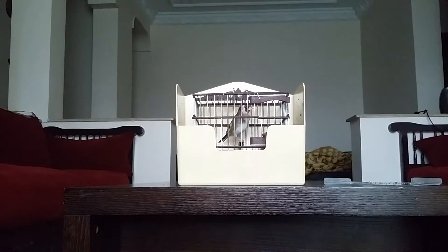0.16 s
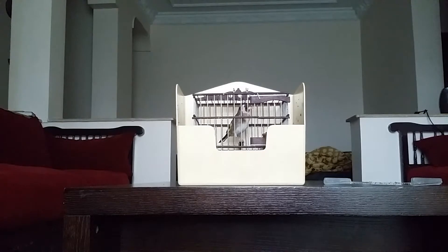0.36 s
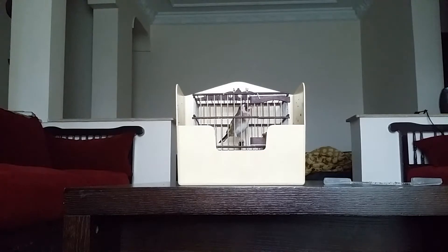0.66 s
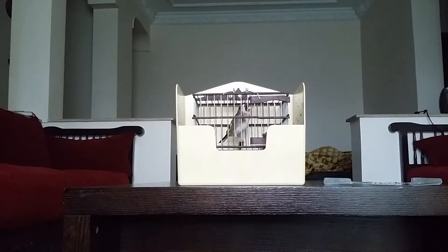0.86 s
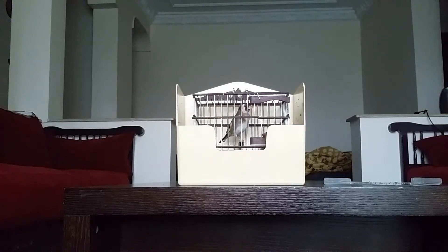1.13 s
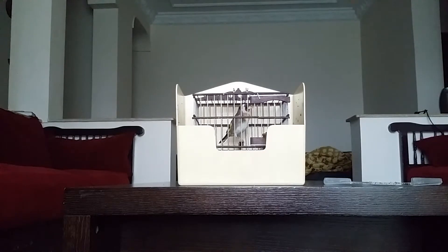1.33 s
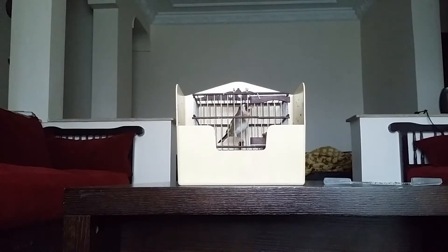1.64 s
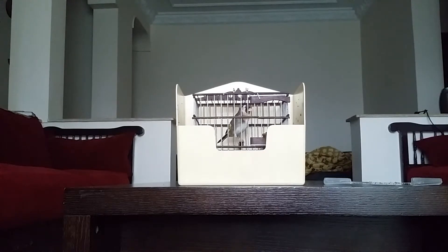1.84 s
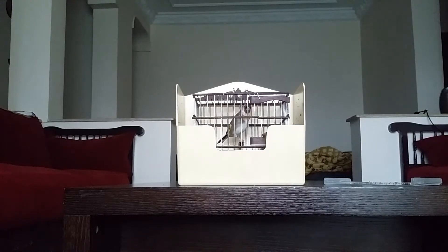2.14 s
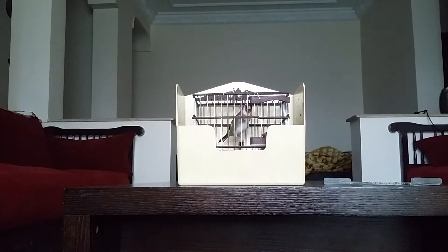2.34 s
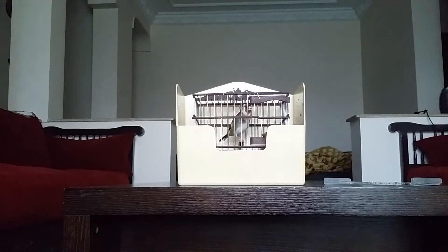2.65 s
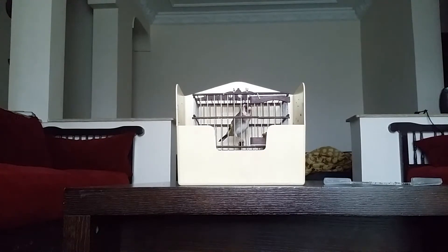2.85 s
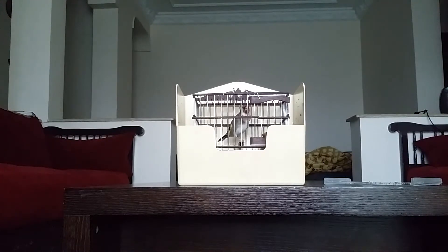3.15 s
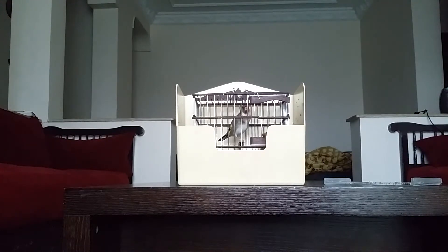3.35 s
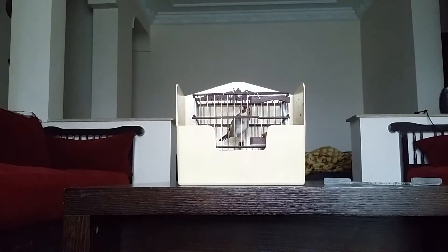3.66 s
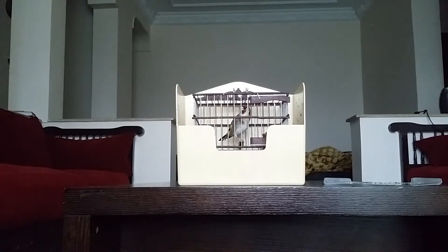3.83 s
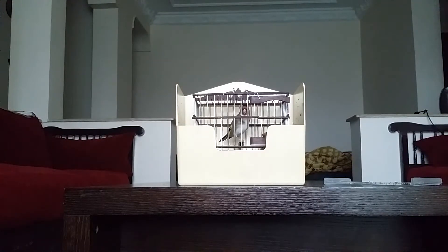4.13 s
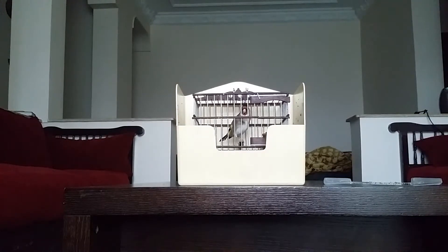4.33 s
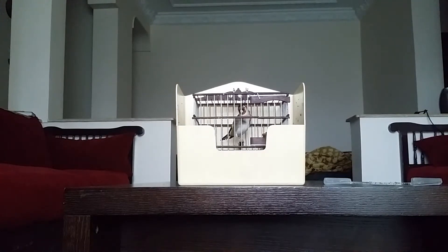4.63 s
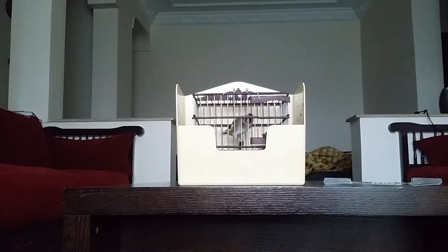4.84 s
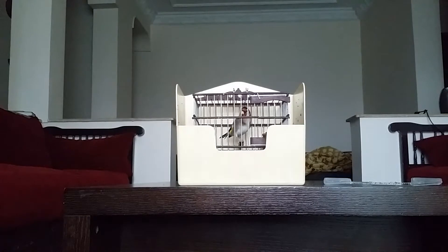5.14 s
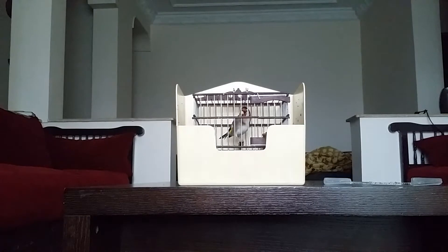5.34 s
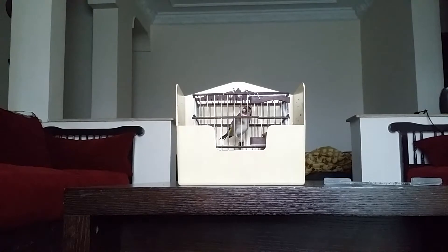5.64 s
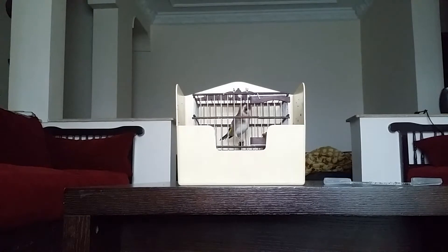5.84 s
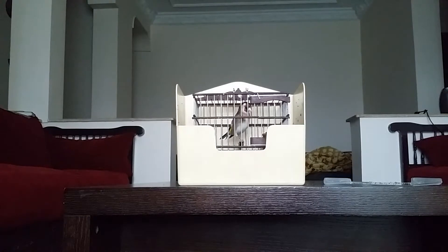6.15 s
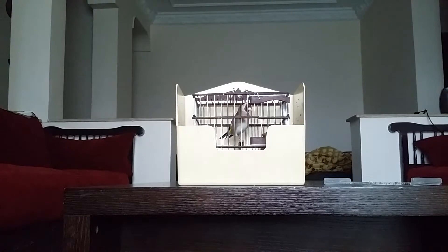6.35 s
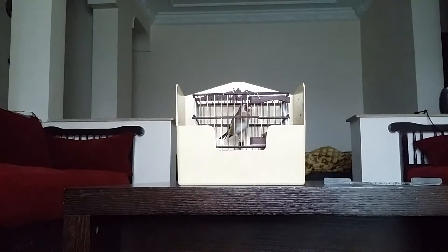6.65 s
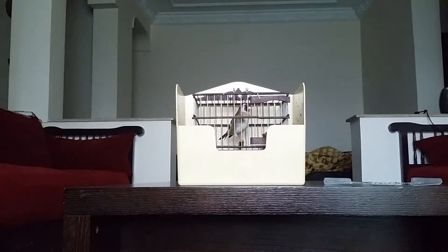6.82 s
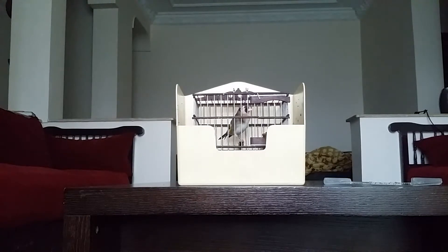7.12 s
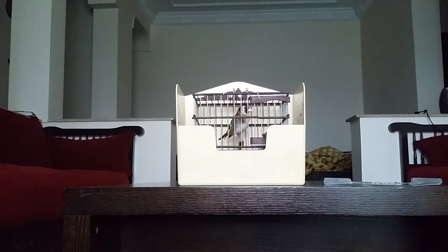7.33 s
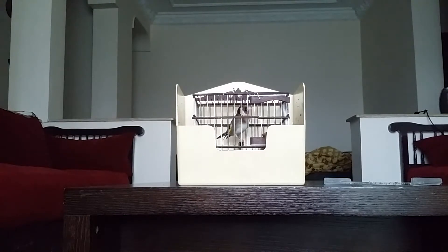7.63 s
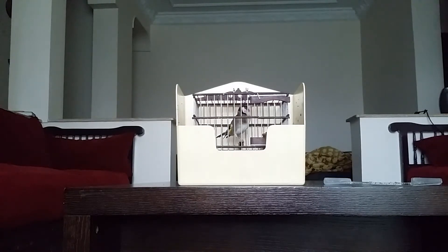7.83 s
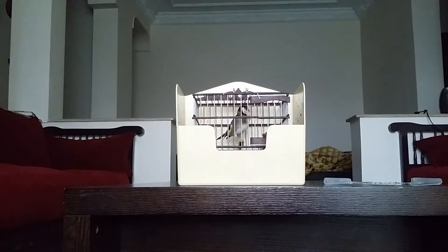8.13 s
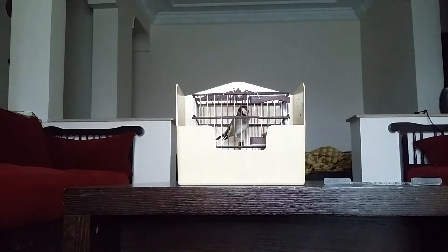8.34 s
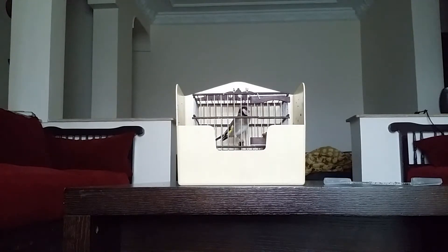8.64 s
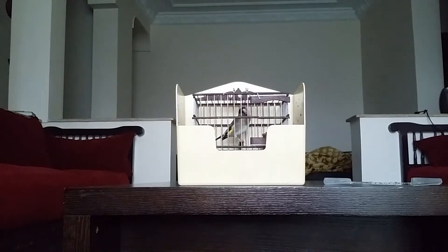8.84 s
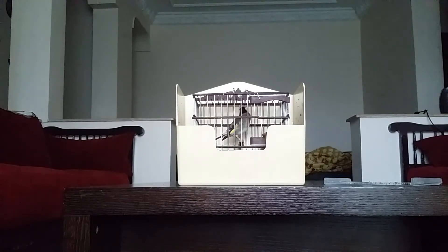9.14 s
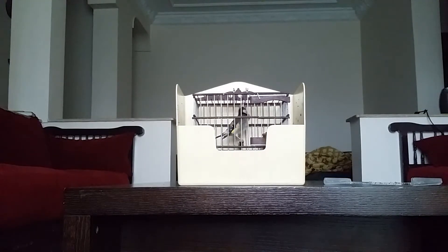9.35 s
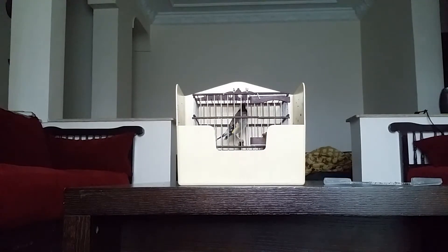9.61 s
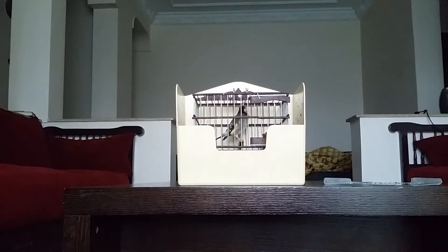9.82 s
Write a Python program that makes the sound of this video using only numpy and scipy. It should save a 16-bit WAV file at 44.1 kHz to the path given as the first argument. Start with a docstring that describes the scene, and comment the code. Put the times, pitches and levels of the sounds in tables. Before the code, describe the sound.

A small caged finch sings in a living room. After a quiet opening of faint hiss, a burst of quick paired whistles starts softly, grows loud and ends abruptly. A pause follows with distant engine hum, then a second, slightly softer burst that fades toward its end. The microphone is a short distance away, with a little room echo.

```python
"""Two bursts of a caged goldfinch's twittering in a living room, over faint engines and a soft hiss.
Each note is a nearly pure whistle gliding onto a held pitch, with 2nd and 3rd harmonics.
Short echoes make the cage; sparse decaying taps make the room.
Engines outside are sums of sine orders; the hiss is shaped noise that swells with the song."""
import sys
import numpy as np
from scipy import signal
from scipy.fft import rfft, irfft, next_fast_len
from scipy.io import wavfile

SR = 44100
rng = np.random.default_rng(int(sys.argv[2]) if len(sys.argv) > 2 else 0)


def master_out(mix):
    """Clip the mix to full scale and print it as 16-bit PCM to the path in sys.argv[1]."""
    frames = np.transpose(np.atleast_2d(mix))
    ceiling = np.clip(frames, -1, 1)
    pcm = np.round(ceiling * 32767).astype(np.int16)
    wavfile.write(sys.argv[1], SR, pcm)


N = 440118


def amp(db):
    """Decibels to gain."""
    return 10 ** (np.asarray(db) / 20)


def evened(x):
    """Scales to rms 1."""
    return x / np.sqrt(np.mean(x ** 2) + 1e-20)


def read(points, hz):
    """Interpolates a table of (f/Hz, value) on a log-frequency axis."""
    f, value = np.transpose(points)
    return np.interp(np.log(hz + 1), np.log(f + 1), value)


def add(mix, start_s, sound):
    """Mixes a sound in at start_s, cut at the end of the mix."""
    part = mix[round(start_s * SR):][:len(sound)]
    part += sound[:len(part)]


def wander(rate_hz):
    """Random drift of rms about 1, moving up to about rate_hz: lines between random knots."""
    place = np.arange(N) * (2 * rate_hz / SR)
    knots = rng.standard_normal(N // 10)
    return np.interp(place, np.arange(len(knots)), knots) * np.sqrt(1.5)  # undoes the rms lost between knots


def swell():
    """Hiss level as rows (t/s, level/dB): a slow creep plus swells that rise, hold and fall."""
    # lift of the hiss around each burst: start/s, rise/s, start of fall/s, fall/s, lift/dB
    swells = [(1.5, 0.48, 4.574, 0.24, 9.34), (6.8, 1.4, 9.57, 0.4, 6.36)]
    start_db, creep_db_per_s = -70.5, 0.6562
    t = np.arange(0, N, SR // 50) / SR
    db = start_db + creep_db_per_s * t
    for start_s, rise_s, end_s, fall_s, lift_db in swells:
        rising = (t - start_s) / rise_s
        falling = 1 - (t - end_s) / fall_s
        db = db + lift_db * np.clip(np.minimum(rising, falling), 0, 1)
    return np.column_stack([t, db])


def hiss(top_hz=3000, top_share=0.91):
    """Street rumble and soft hiss: shaped noise, body and treble swelling together, treble a little less."""
    # relative noise spectrum: f/Hz, density/dB
    spectrum = [(26, -37.5), (45, -5), (91, 1), (159, -7), (264, -1), (337, -10), (390, -10.5),
                (496, -15.5), (979, -17), (1110, -15), (4000, -28), (12800, -33.5), (14800, -37.5)]
    n = next_fast_len(N, True)
    t, db = np.transpose(swell())
    hz = np.fft.rfftfreq(n, 1 / SR)
    z = rfft(rng.standard_normal(n)) * amp(read(spectrum, hz))
    z /= np.std(irfft(z * (hz > 600) * (hz < 2000), n))  # level is set in 600-2000 Hz
    swell_db = np.interp(np.arange(N) / SR, t, db) - db[0]
    low = 1 / (1 + (hz / top_hz) ** 2)
    body = irfft(z * low, n)[:N]
    treble = irfft(z * (1 - low), n)[:N]
    return amp(db[0]) * (body * amp(swell_db) + treble * amp(top_share * swell_db))


def engine(speed, surges, wobble=.006, fading_db=3.0, step=14):
    """Firing orders follow an unsteady engine speed; each surges and flutters on its way through the walls."""
    t = np.arange(0, N, step) / SR  # one point per step samples
    hz = np.interp(t, *np.transpose(speed)) * (1 + wobble * wander(5)[::step])
    phase = 2 * np.pi * np.cumsum(hz) * step / SR
    drone = 0
    for order, peak_s, half_s, db in surges:
        surge = amp(db + fading_db * wander(8)[::step]) / (1 + ((t - peak_s) / half_s) ** 2)
        drone = drone + surge * np.sin(round(order) * phase)
    return signal.resample_poly(drone, step, 1)[:N]


def street():
    """Three engines speed up or slow down outside; their orders surface in turn."""
    # engine speeds before wobble: t/s, f/Hz; the near one drops once, at a gear change
    slow_speed = [(7, 31), (9, 28)]
    near_speed = [(1.4, 31.58), (2.25, 33.6), (3.35, 43.6), (3.6, 38.63), (5.7, 46.5)]
    far_speed = [(5, 33.03), (6, 36.16), (8, 46.01), (9.98, 55.52)]
    # surges of the orders: multiple of the cycle, t of peak/s, time to half amplitude/s, level before fading/dB
    slow_surges = [(2, 8.15, 0.53, -48)]
    near_surges = [(2, 2.65, 0.28, -37), (2, 4.35, 0.26, -46), (3, 2.8, 0.5, -50.5), (4, 5.2, 0.36, -55),
                   (8, 2.5, 0.63, -53), (5, 2.85, 0.36, -48), (6, 2.5, 0.24, -49), (6, 3.25, 0.19, -44),
                   (7, 2.45, 0.4, -50)]
    far_surges = [(2, 6.3, .4, -54), (2, 8.85, .25, -48), (7, 6, .4, -56), (5, 6.5, 0.32, -57),
                  (10, 6.8, .2, -61), (3, 5.6, 0.2, -52.5), (3, 6.33, .2, -49.5), (3, 7.9, 0.63, -48.5),
                  (3, 9.2, .35, -49), (4, 8.5, 0.38, -51.5), (4, 9.5, .18, -47.5), (5, 10, 0.76, -52.5),
                  (6, 6.95, 0.12, -46), (6, 7.75, 0.38, -48), (6, 8.6, 0.35, -51), (7, 7.25, .3, -52)]
    return engine(near_speed, near_surges) + engine(far_speed, far_surges) + engine(slow_speed, slow_surges)


def room(x, wet_db, build_s=0.0031, spacing=12):
    """Sparse wall reflections of random sign, each band dying at its own speed."""
    # decay of the room: f/Hz, t60/s
    decay = [(2500, 0.41), (4000, 0.38), (6500, 0.34), (14000, 0.18)]
    taps = np.zeros(SR)
    at = np.arange(0, SR - spacing, spacing)
    taps[at + rng.integers(0, spacing, len(at))] = rng.choice([-1., 1.], len(at))
    hz, t, z = signal.stft(taps, SR, nperseg=256)
    dying = amp(-60 * t / read(decay, hz)[:, None])
    tail = signal.istft(z * dying, SR, nperseg=256)[1]
    tail *= 1 - np.exp(-(np.arange(len(tail)) / SR / build_s) ** 2)
    return amp(wet_db) * signal.fftconvolve(x, tail / np.linalg.norm(tail))[:N]


def cage(sound):
    """Hard surfaces close to the bird repeat each glide, which beats against itself."""
    # reflections from the cage box and table: delay/s, level/dB re direct
    echoes = [(.0013, -18), (.0026, -21), (.0058, -23.5), (0.0125, -12)]
    out = sound.copy()
    for delay_s, db in echoes:
        add(out, delay_s, amp(db) * sound)
    return out


def tick(start_s=4.875, db=-54, t60_s=0.018, low_hz=2600, high_hz=4400):
    """The bird touches the cage once, lightly: a decaying burst of band-passed noise."""
    t = np.arange(SR // 20) / SR
    band = signal.butter(2, [low_hz, high_hz], "band", fs=SR, output="sos")
    wire = signal.sosfilt(band, rng.standard_normal(len(t)))
    out = np.zeros(N)
    add(out, start_s, amp(db - 60 * t / t60_s) * evened(wire))
    return out


def notes():
    """Song as (t/s, kind, length/s, start f/Hz, end f/Hz, level/dB); half syllables stretch and pitch as wholes."""
    # opening and closing half of each syllable, a list of notes each: kind, start and length/share of the half,
    # start and end pitch/share of the held pitch, level/dB re the half
    syllables = { "twitter": ([("rise", .015, .66, .925, .99, 0)], [("dip", 0, 0.59, 1.395, 1.283, -5),
                 ("drop", 0.5, .56, 1.122, 0.99, 0)]), "swoop": ([("chip", -.38, .35, .67, .74, -6.5),
                 ("rise", 0, 0.89, .79, 1, 0)], [("chip", -0.041, 0.29, .89, .93, -6.5),
                 ("dive", 0, 0.9, 1.305, 0.99, 0)]), "yodel": ([("chip", -.4, .39, .665, 0.724, -5),
                 ("leap", .02, 0.86, 0.81, 1, 0)], [("dive", 0, 0.95, 1.297, 1, 0)]),
                 "skip": ([("chip", -0.39, 0.38, .72, .77, -9), ("leap", 0, 0.58, 0.7, 0.96, 0)],
                 [("chip", 0, 0.4, 1.3, 1.27, -10.5), ("slide", .31, .69, 1.14, 0.97, 0)]),
                 "flick": ([("chip", -.38, 0.34, .66, 0.726, -7.5), ("rise", 0, 0.84, .78, 0.98, 0)],
                 [("chip", 0, 0.27, .9, 0.92, -8.5), ("plunge", 0, 0.94, 1.25, 0.95, 0)]),
                 "slur": ([("chip", -0.38, 0.38, .69, .73, -19), ("hook", 0.04996, .8, 0.8534, 0.99, 0)],
                 [("slide", 0.018, 1.03, 1.197, 1, 0)]), "whistle": ([("chip", -0.1, 0.22, .61, .69, -1.3),
                 ("whip", -0.013, 0.75, 0.77, 1, 0)], [("hook", 0, 0.94, 0.74, 0.95, 0)])}
    # syllables sung, in two bursts: t/s, syllable, opening length/s, held f/Hz, level/dB,
    # closing length/s, held f/Hz, level/dB
    sung_syllables = [ (1.739, "twitter", 0.083, 3786, -23, 0.0997, 4396, -14),
                      (2.052, "twitter", 0.083, 3759, -13, 0.1, 4464, -8),
                      (2.374, "twitter", 0.077, 3821, -10, 0.094, 4513, -7.5),
                      (2.616, "yodel", 0.052, 4356, -3.5, 0.068, 4780, -11),
                      (2.782, "swoop", 0.057, 4000, -8.5, 0.076, 4933, -12),
                      (2.958, "swoop", 0.063, 3958, -10, 0.066, 4810, -9.5),
                      (3.134, "slur", 0.0704, 3664, -10.5, 0.044, 4667, -8.5),
                      (3.336, "slur", 0.068, 3603, -11, 0.06, 4465, -6),
                      (3.551, "slur", 0.056, 3490, -10.5, 0.088, 4412, -6.5),
                      (3.794, "slur", 0.058, 3577, -13.5, 0.083, 4392, -5.5),
                      (4.002, "whistle", 0.084, 6427, -9.5, 0.072, 4080, -11),
                      (4.205, "whistle", 0.086, 6350, -10, 0.071, 3980, -11.5),
                      (4.415, "whistle", 0.087, 6212, -11.5, 0.071, 4012, -12.5),
                      (7.615, "twitter", 0.086, 3760, -26.5, 0.1, 4383, -17),
                      (7.94, "twitter", 0.086, 3775, -14.5, .11, 4404, -12),
                      (8.269, "twitter", 0.083, 3828, -9, 0.097, 4546, -9.5),
                      (8.518, "skip", 0.059, 4135, -9.5, 0.064, 4946, -8.5),
                      (8.697, "swoop", 0.06, 3904, -12, 0.076, 4757, -14),
                      (8.881, "flick", 0.057, 4003, -11.5, 0.077, 4940, -13.5),
                      (9.067, "flick", 0.067, 3963, -13, 0.059, 4970, -15.5),
                      (9.264, "slur", 0.072, 3618, -14, 0.082, 4502, -14.5),
                      (9.497, "slur", 0.067, 3497, -15.5, 0.076, 4254, -17.5)]
    # lone low chip announcing each twitter: t/s, level/dB
    chips = [(1.669, -22.5), (1.964, -16), (2.295, -10), (7.539, -22), (7.858, -20), (8.19, -17)]
    # short, mostly faint sinking notes beside or between the main ones:
    # t/s, length/s, start f/Hz, end f/Hz, level/dB
    asides = [(1.762, .01, 4530, 4060, -37), (1.969, 0.011, 3400, 3170, -20.5),
              (7.627, 0.011, 4500, 4100, -40), (1.848, 0.02, 2860, 2800, -37),
              (2.19, 0.018, 5750, 5150, -24), (4.045, 0.018, 3650, 3100, -19.5),
              (8.535, 0.039, 4480, 4190, -11.5), (9.335, 0.025, 5472, 5160, -13),
              (9.343, 0.019, 6070, 5410, -17.5), (9.565, 0.026, 5100, 4670, -14.5)]
    chip_s, chip_start_hz, chip_end_hz = 0.03333, 2786, 3097
    sung = [(s, "chip", chip_s, chip_start_hz, chip_end_hz, db) for s, db in chips]
    sung += [(s, "drop", *rest) for s, *rest in asides]
    for s, syllable, *halves in sung_syllables:
        for figure, (length_s, hz, db) in zip(syllables[syllable], np.reshape(halves, (2, -1))):
            for kind, start, share, first, last, note_db in figure:
                sung.append((s + start * length_s, kind, share * length_s,
                             first * hz, last * hz, db + note_db))
            s = s + length_s  # closing half follows the opening
    return sung


def finch(third_db=-8, fray=.4):
    """Each note is one puff through the syrinx as its tension settles between pitches: whistle and overtones."""
    # kinds of note: place of mid-glide/share, suddenness of glide/power,
    # place of loudness peak/share (clipped to .2-.7), overtones/dB
    kinds = { "chip": (0.41, 4.65, 3.6, 0.5), "rise": (0.31, 3.5, .65, -6.5), "hook": (.22, 2.5, .2, -2),
             "leap": (0.14, 3.5, 0.1, -5), "plunge": (.38, 4.5, 0.33, 7.5), "whip": (.16, 3.6, .55, 4),
             "dip": (0.46, 6.97, 0.96, 0.5), "dive": (0.41, 4.8, 0.81, 4.2), "drop": (0.4, 2.9, 1.1, 1.6),
             "slide": (0.31, 3.5, 4.5, -0.5)}
    # radiation of overtones by the beak: f/Hz, level/dB
    beak = [(6500, -33.5), (7300, -34), (8200, -44), (9600, -39), (12600, -33.5), (14000, -35)]
    # beaming of overtones as the head turns, read once a note: t/s, level/dB
    bright = [(3.3, -3.5), (3.6, -3.5), (4.5, -1.5), (8.4, -2), (8.97, -1), (9.2, 3), (9.6, 6.5)]
    scoop_share, scoop_s = .025, .004  # notes scoop up from below
    thin_up_db, thin_down_db = -4, 0.5  # mid-glide level: thinner when climbing, slightly fuller when falling
    jitter_share, flutter_db, hoarse_share = .002, 1., .11
    rise_power, fall_power = 1.15, .6
    attack_s, release_s = .007, .004

    song, overtones = np.zeros((2, N))
    tremble, flutter, grain = wander(450), flutter_db * wander(150), wander(550)
    for s, kind, length_s, start_hz, end_hz, db in notes():
        glide, bend, peak, overtone_db = kinds[kind]
        u = np.linspace(0, 1, int(length_s * SR))
        now = round(s * SR) + np.arange(len(u))

        travel = 1 - 1 / (1 + (u / glide) ** bend)  # holds, moves, then creeps onto the last pitch
        hz = start_hz + (end_hz - start_hz) * travel / travel[-1]
        hz *= 1 - scoop_share * np.exp(-u * length_s / scoop_s)
        phase = 2 * np.pi * np.cumsum(hz * (1 + jitter_share * tremble[now])) / SR

        # air pressure builds gently and is cut off more steeply
        arch = np.interp(u, [0, np.clip(peak, .2, .7), 1], [0, .5, 1])
        puff = abs(np.sin(np.pi * arch)) ** np.where(arch < .5, rise_power, fall_power)
        puff *= amp(db + flutter[now])
        edge = np.clip(np.minimum(u / attack_s, (1 - u) / release_s) * length_s, 0, 1)
        puff *= np.sin(np.pi / 2 * edge) ** 2
        puff *= 1 + hoarse_share * np.sin(np.pi * travel) * grain[now]  # hoarsest in mid-glide
        if kind not in ("hook", "chip"):
            thin_db = thin_up_db if end_hz > start_hz else thin_down_db
            puff *= amp(thin_db * np.sin(np.pi * travel) ** 2)

        second = amp(read(beak, 2 * hz)) * np.sin(2 * phase)
        third = amp(read(beak, 3 * hz) + third_db) * np.sin(3 * phase)
        bright_db = np.interp(s, *np.transpose(bright))
        add(song, s, puff * np.sin(phase))
        add(overtones, s, amp(overtone_db + bright_db) * puff * (second + third))
    # overtones waver more than the whistle
    overtones = overtones * (1 + fray * wander(700)) * amp(3.7 * wander(40))
    return song, overtones


def scene():
    """The bird in its cage and room, with the street behind; whistle and overtones have their own room levels."""
    song, overtones = finch()
    whistle = amp(-3.0) * cage(song) + room(song, wet_db=-11.0)
    sheen = amp(-4.0) * cage(overtones) + room(overtones, wet_db=-10.5)
    return (whistle + sheen + tick() + street() + hiss())[None]


def record(dry, low_cut_hz=43, edge_hz=14900):
    """The recorder's bass cut and band limit."""
    bass_cut = signal.butter(3, low_cut_hz, "high", fs=SR, output="sos")
    thinned = signal.sosfilt(bass_cut, dry)
    band_limit = signal.firwin(511, edge_hz, window=("kaiser", 9), fs=SR)
    return signal.oaconvolve(thinned, band_limit[None], "same")


dry = scene()
out = record(dry)
master_out(out)
```